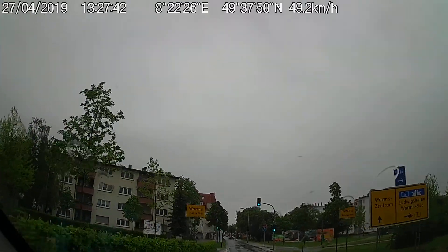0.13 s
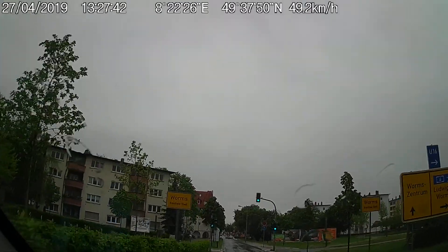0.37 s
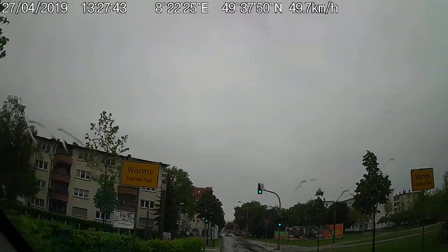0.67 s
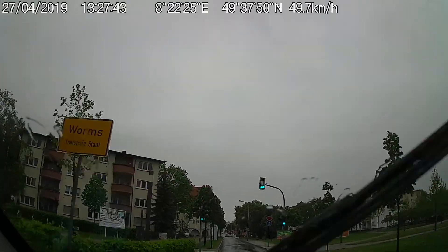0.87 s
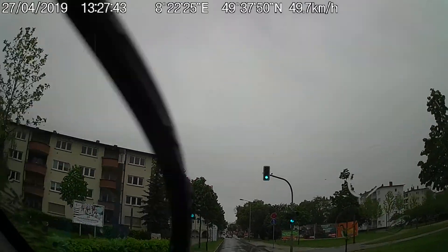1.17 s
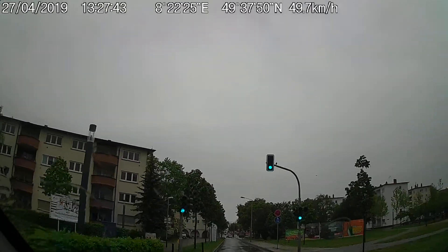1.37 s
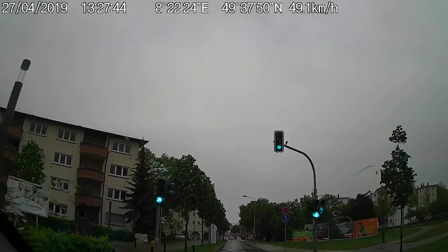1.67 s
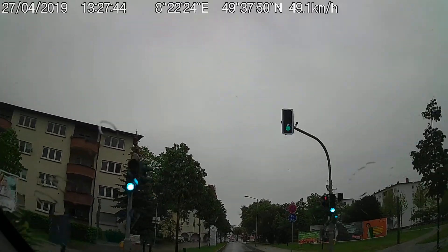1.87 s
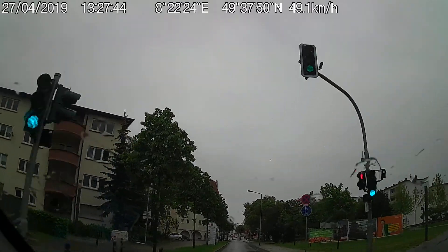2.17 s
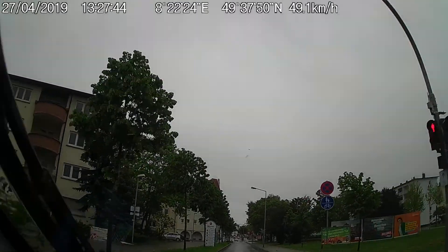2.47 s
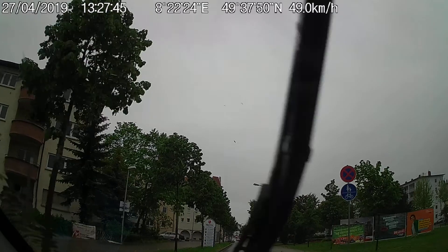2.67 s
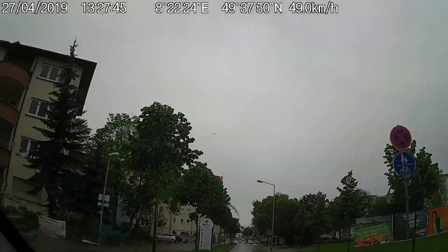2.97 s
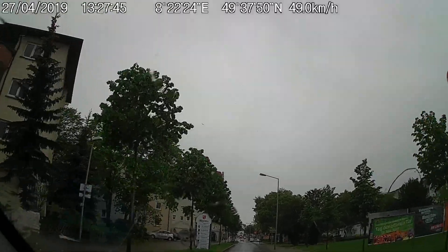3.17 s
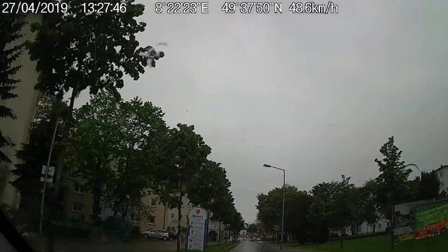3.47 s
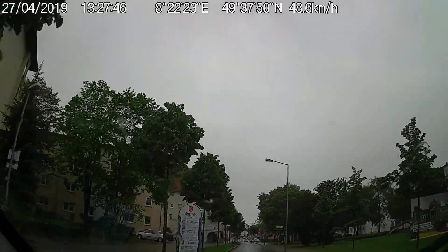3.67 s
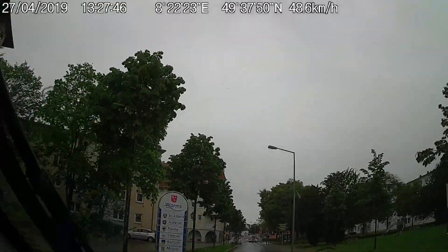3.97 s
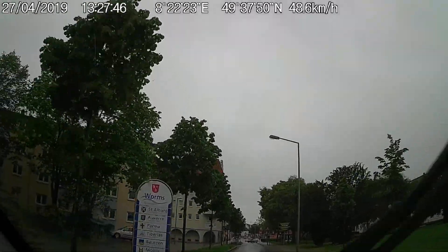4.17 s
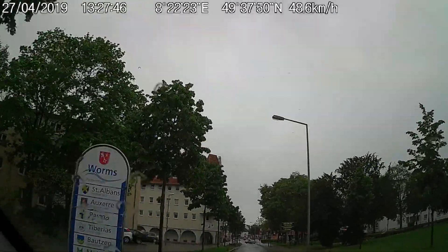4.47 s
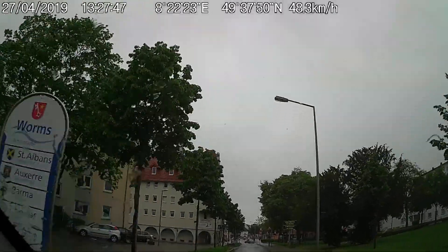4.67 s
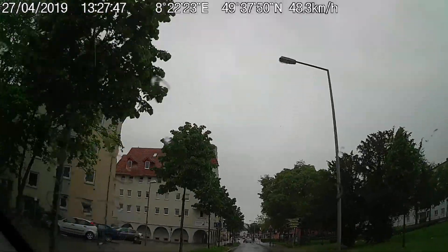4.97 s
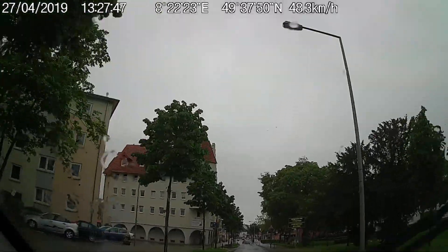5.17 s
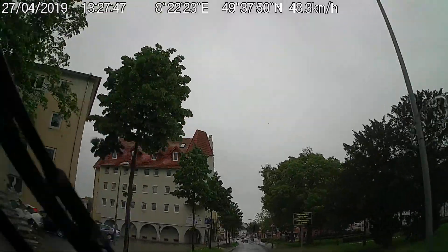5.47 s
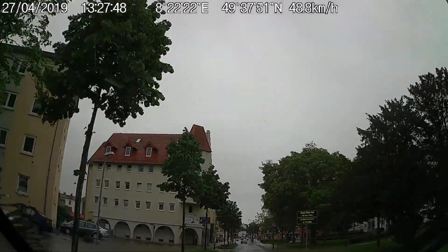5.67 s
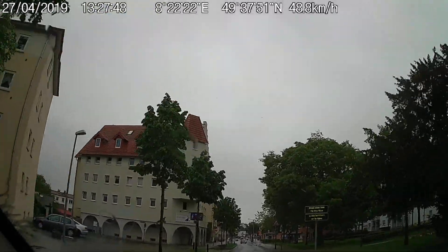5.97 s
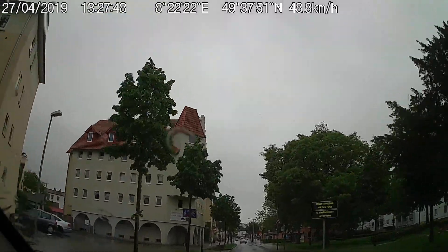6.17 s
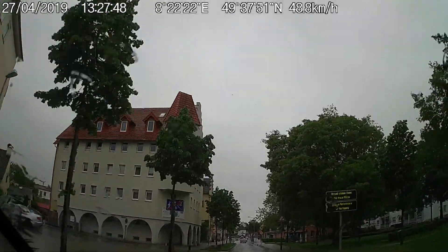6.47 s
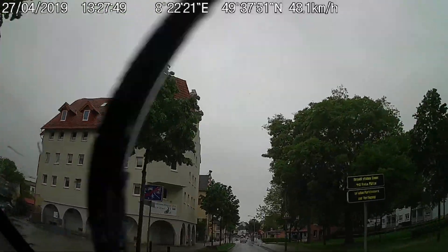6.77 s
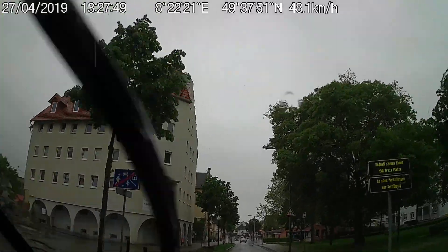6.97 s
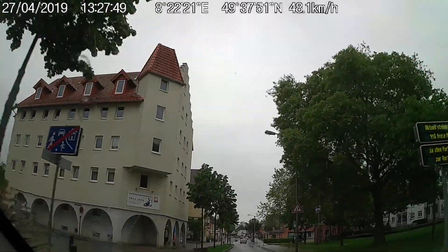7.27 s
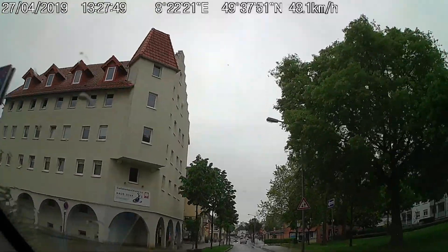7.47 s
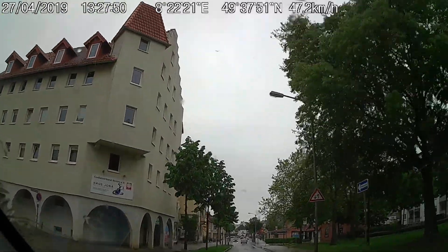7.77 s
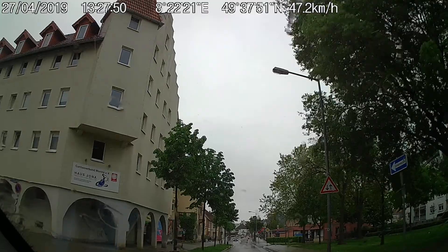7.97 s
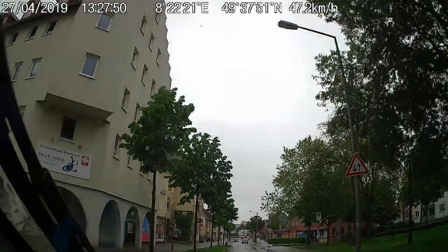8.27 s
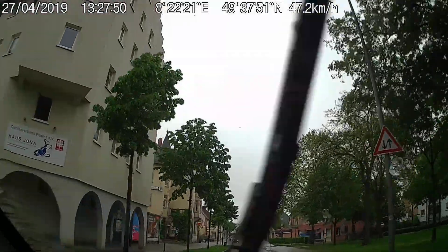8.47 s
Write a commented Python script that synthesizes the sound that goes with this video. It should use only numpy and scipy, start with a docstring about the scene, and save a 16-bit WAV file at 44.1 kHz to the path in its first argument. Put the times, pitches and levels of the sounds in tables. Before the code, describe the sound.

Dull car-cabin rumble on wet asphalt with raindrops tapping the windscreen, occasional soft wiper thuds and hard knocks, and a faint engine hum swelling near the end.

```python
"""Car cabin in light rain

Inside a car rolling through town, heard by a small camera on the windscreen.
Filtered noise makes wet road roar and panel boom; clicks and spatter ring the glass as raindrops.
Thumps and judder, from wipers or road bumps, and linkage clacks ring decaying cabin modes;
the wiper blade squeaks and chirps, and short treble fizzes come mostly at loud thumps.
Gliding sines make a low engine drone that swells now and then, over wavering drive-train tones;
the camera adds pulsing hiss, frame hum and thin whistles."""
import sys
import numpy as np
from scipy import signal
from scipy.fft import rfft, irfft, next_fast_len
from scipy.io import wavfile
from scipy.ndimage import uniform_filter1d

SR = 44100
rng = np.random.default_rng(int(sys.argv[2]) if len(sys.argv) > 2 else 0)


def log_audio(samples):
    """Write samples as a 16-bit WAV file to the path given in sys.argv[1]."""
    # one column per channel
    frames = np.atleast_2d(samples).T
    # limit to full scale, then quantise
    limited = np.clip(frames, -1, 1)
    pcm = np.round(limited * 32767).astype(np.int16)
    wavfile.write(sys.argv[1], SR, pcm)


N = 380141

# Wiper linkage clacks: start_s, peak_db, colour_centre_hz, ring_share (of the cabin modes' t60)
CLACKS = [(.612, -20, 530, 0.41), (0.698, -13, 240, .4), (.812, -17, 340, .6), (0.844, -24, 380, .7),
          (1.244, -23, 480, 0.46), (1.302, -17.5, 440, 1.1), (1.372, -12, 710, 0.7), (1.383, -4, 226, 0.47),
          (1.386, -10.5, 453, 0.49), (1.466, -17.5, 330, 0.34), (1.978, -21, 374, 0.56),
          (2.033, -17, 410, 0.69), (4.049, -24, 300, 0.72), (4.378, -22.5, 397, 1.3), (4.544, -23, 380, .6),
          (6.165, -21, 340, 1), (7.86, -17.5, 500, .45), (7.941, -24, 503, 1), (8.049, -21, 340, 0.79),
          (8.49, -27, 400, 0.4), (8.533, -16, 442, .6), (8.605, -15.5, 795, 0.97), (8.614, -5, 313, .85)]


def amp(db):
    """Amplitude factor for a level in dB."""
    return 10 ** (np.asarray(db) / 20)


def evened(x):
    """Scales x to rms 1."""
    return x / np.sqrt(np.mean(x ** 2) + 1e-20)


def read(points, hz):
    """Reads a (frequency, value) curve along a log frequency axis."""
    f, value = np.transpose(points)
    return np.interp(np.log(hz + 1), np.log(f + 1), value)


def add(mix, s, sound):
    """Lays a sound into the mix from second s, cut off at the end."""
    part = mix[round(s * SR):][:len(sound)]
    part += sound[:len(part)]


def resonate(x, hz, width):
    """One resonance with a gain near 1 at its centre; a complex pole sets pitch and width in Hz."""
    r = np.exp(-np.pi * width / SR)
    pole = r * np.exp(2j * np.pi * hz / SR)
    return 2 * signal.lfilter([1 - r], [1, -pole], x).real


def coloured(x, points):
    """Filters x by a spectrum in dB."""
    size = next_fast_len(N)
    gain = amp(read(points, np.fft.rfftfreq(size, 1 / SR)))
    return irfft(rfft(x, size) * gain, size)[:N]


def wander(seconds):
    """Smooth random drift of rms 1: noise averaged twice over the given time."""
    span = max(round(seconds * SR), 1)
    once = uniform_filter1d(rng.standard_normal(N), span)
    return evened(uniform_filter1d(once, span))


def burst(noise, t60):
    """Noise that fades in within half a millisecond and dies away over t60 seconds."""
    t = np.arange(noise.shape[-1]) / SR
    return noise * amp(-60 * t / t60) * np.minimum(t / 0.00045, 1)


def peaked(x, hz, width):
    """A steep band of x, three resonances in a row, with its peak at 1."""
    band = x
    for _ in range(3):
        band = resonate(band, hz, width)
    return band / abs(band).max()


def dips(t):
    """Brief level sags in dB at times t, each with a slow sink and a quick return."""
    # return_s, depth_db, sinking_time_s
    dip_table = [(.12, -0.5, 0.03), (2.15, -4, .05), (2.77, -5, 0.015), (3.43, -7, .03), (3.79, -4, 0.056),
                 (4.115, -5, 0.035), (4.715, -6, 0.014), (4.96, -5, 0.027), (5.6, -2, 0.048),
                 (5.695, -0.5, 0.023), (5.985, -6, 0.033), (6.115, -8, 0.023), (6.274, -11.5, 0.053),
                 (6.705, -6.5, 0.045), (6.85, -2, 0.084), (7.12, -9, 0.015)]
    return_time_s = 0.0031
    level_db = 0
    for s, depth_db, sink_s in dip_table:
        side_s = np.where(t < s, sink_s, return_time_s)
        level_db = level_db + depth_db * np.exp(-((t - s) / side_s) ** 2)
    return level_db


def road(patchy_db=0.97, flicker_db=1.5, gust_db=1.47):
    """Tyre roar on wet asphalt: noise with drifting patches, gusts and a flicker where spray lands."""
    # Course of the ride, only the change about each mean counts: time_s, roar_level_db, spray_level_db
    ride = [(0, -35.5, -44.5), (.15, -33, -49.5), (.72, -33, -50.5), (1.4, -37, -53), (1.9, -35.5, -53),
            (2.16, -39.5, -54.5), (2.64, -35, -51), (3.2, -39, -56), (3.5, -33, -48.5), (3.75, -37, -55),
            (3.98, -35, -50.5), (4.37, -34, -48.5), (5.55, -35, -50), (6.05, -36.5, -50.5),
            (6.75, -34.5, -52.5), (7.0, -34, -49.5), (7.73, -34.5, -50), (8.0, -34.5, -52),
            (8.62, -32.5, -49.5)]
    # Relative spectrum of the roar and spray: frequency_hz, level_db (per Hz)
    roar_spectrum = [(12, -28), (26, -6), (48, -1), (68, -17), (130, -15), (200, -15.5), (400, -12),
                     (650, -16), (900, -12.5), (1250, -17.5), (1800, -27), (2300, -39.5), (2850, -29.5),
                     (3500, -36), (4100, -55.5), (6500, -57), (12000, -78)]
    s, roar_db, spray_db = np.transpose(ride)
    # Short-time spectra of 512 samples, one every 128
    frames, hz = N // 128 + 5, np.fft.rfftfreq(512, 1 / SR)
    t = (np.arange(frames) * 128 - 256) / SR
    real, imag, patches = rng.standard_normal((frames, 257, 3)).T
    patches = evened(uniform_filter1d(uniform_filter1d(patches, 6, 0), 20, 1))
    flicker = evened(uniform_filter1d(rng.standard_normal(frames), 5))
    gusts = evened(uniform_filter1d(uniform_filter1d(rng.standard_normal(frames), 20), 20))

    low_db = np.interp(t, s, roar_db - roar_db.mean())
    high_db = np.interp(t, s, spray_db - spray_db.mean())
    top = np.clip((hz - 1900) / 600, 0, 1)[:, None]  # spray takes over from roar around 2 kHz
    swing_db = (1 - top) * low_db + top * high_db + gust_db * gusts + dips(t)
    share = np.clip(hz / 400, 0, 1)[:, None]  # the bass hardly follows these changes
    moving_db = (flicker_db + 1.27 * top) * flicker + swing_db
    field = (real + 1j * imag) * amp(patchy_db * patches + share * moving_db)
    noise = signal.istft(field, nperseg=512, noverlap=384)[1][:N]
    return amp(-35.0) * evened(coloured(noise, roar_spectrum))


def boom(lumpy_db=1.5):
    """Noise in the panel resonances, lumpy, with swells over a steady level."""
    # Shaken panels: frequency_hz, width_hz (each of two passes), relative_gain_db
    panel_table = [(47.5, 22.3, 3), (108, 36, 4.5), (140, 36, 3.5), (230.3, 77.5, -8), (380, 514, -15),
                   (528, 260, -37)]
    # Swells added to the steady boom: centre_s, top_db (before the lumps), half_width_s
    swell_table = [(.78, -25, 0.22), (1.4, -31, 0.14), (1.6, -39.5, 0.45), (2.0, -31, 0.11),
                   (4.1, -40, 0.045), (4.4, -40, 0.019), (4.78, -39, 0.17), (6.2, -36.5, 0.24),
                   (8.04, -24, 0.22), (8.55, -22.5, 0.023)]
    steady_db = -39
    shake, t = rng.standard_normal(N), np.arange(N) / SR
    panels = sum(amp(db) * resonate(resonate(shake, hz, width), hz, width)
                 for hz, width, db in panel_table)
    level = amp(steady_db)
    for centre_s, db, half_s in swell_table:
        level = level + amp(db) * np.exp(-((t - centre_s) / half_s) ** 2)
    return level * amp(lumpy_db * wander(0.028)) * evened(panels)


def cruise():
    """Drive-train hum: narrow bands of noise, heard as tones that waver in level and pitch."""
    # frequency_hz, level_db (rms)
    tone_table = [(53, -40.5), (78, -45), (135, -45.5)]
    noise = rng.standard_normal(N)
    return sum(amp(db) * evened(resonate(resonate(noise, hz, 3.4), hz, 3.4)) for hz, db in tone_table)


def electronics(loud):
    """Camera hiss pulsing with frame and line clocks, hum and whistles; loud blows stir the hiss."""
    # Relative hiss spectrum: frequency_hz, level_db (per Hz)
    hiss_spectrum = [(2600, -14), (4500, -2.5), (7500, -6.5), (10100, -3.5), (11000, -2), (12400, -2.5),
                     (13800, -5), (14400, -1.5), (15000, -6), (16000, -7)]
    # Frame hum before its slow waver: multiple_of_frame_rate, level_db (rms)
    hum_table = [(1, -43), (3, -43), (4, -48), (6, -54), (7, -47), (8, -57), (10, -57), (12, -54)]
    # Thin whistles: frequency_hz, level_db (rms)
    whistle_table = [(7112, -81), (7144, -86), (12487, -88), (14224, -82), (14258, -86), (14288, -80)]
    frame_hz, line_hz, hiss_db = 30.0, 307.2, -59
    t = np.arange(N) / SR
    pulse = 1 + 0.058 * np.cos(2 * np.pi * frame_hz * t) + 0.047 * np.cos(4 * np.pi * frame_hz * t)
    pulse = pulse + 0.11 * np.cos(2 * np.pi * line_hz * t)
    stirred = 1 + 0.86 * abs(loud)
    noise = rng.standard_normal(N) * pulse * stirred * amp(0.77 * wander(0.017))
    hiss = amp(hiss_db) * evened(coloured(noise, hiss_spectrum))

    hum = sum(amp(db) * np.sin(2 * np.pi * (k * frame_hz * t + rng.random())) for k, db in hum_table)
    hum = hum * amp(0.44 * wander(0.11))

    jitter = wander(0.03) / 14000  # the clock drifts, which widens the whistles
    clock = 2 * np.pi * t + 0.9 * jitter
    whistles = sum(amp(db) * np.sin(hz * clock + 6 * rng.random()) for hz, db in whistle_table)
    return hiss + np.sqrt(2) * (hum + whistles)


def tap(levels_db, noise, t60=0.019):
    """A hit on the glass: one click and a weaker spatter ring three broad bands."""
    # Glass bands: frequency_hz, width_hz (each of three passes)
    glass_bands = [(1150, 1200), (2900, 1500), (5500, 4000)]
    click = np.arange(noise.shape[-1]) == 4
    hits = 0.23 * burst(noise, t60) + click
    return sum(amp(db) * peaked(hit, hz, width)
               for db, hit, (hz, width) in zip(levels_db, hits, glass_bands))


def rain():
    """Big drops on the glass one by one, over a random patter of small ones."""
    # start_s, body_peak_db (near 1.2 kHz), tick_peak_db (near 3 kHz), splash_peak_db (near 5.5 kHz)
    drop_table = [(0.128, -25, -46, -58), (0.138, -18, -33, -52), (0.236, -23, -38, -61),
                  (0.325, -29, -33, -60), (0.413, -15, -25, -43), (.483, -26, -36, -62),
                  (0.533, -24, -28.5, -55), (.585, -28, -36, -58), (0.936, -26, -36, -61),
                  (.992, -24, -44, -58), (1.291, -24.5, -39, -57), (1.416, -30, -35, -60),
                  (1.803, -27, -32.5, -52), (1.842, -24, -30, -59), (2.091, -28, -45, -57),
                  (2.286, -30, -36, -59), (2.517, -28, -33.5, -65), (2.775, -43, -42, -52),
                  (2.86, -25.5, -33, -56), (3.53, -36, -35.5, -58), (3.903, -32, -42, -55),
                  (4.013, -26, -34, -60), (4.071, -32, -46, -60), (4.281, -28, -36, -58),
                  (4.341, -25, -31, -55), (4.574, -26, -32, -50), (4.909, -22, -33, -52),
                  (5.192, -28, -34, -51), (5.259, -29, -34, -65), (5.472, -25, -38, -52),
                  (5.579, -34, -37, -46), (5.698, -33, -39, -60), (6.281, -30, -42, -60),
                  (6.364, -33, -37, -62), (6.567, -34, -37, -54), (6.712, -40, -42, -64),
                  (6.857, -24.5, -34, -65), (6.959, -37, -38, -56), (7.04, -23.5, -33.5, -56),
                  (7.069, -30, -39, -61), (7.382, -28, -36, -50), (7.826, -21, -37, -63),
                  (7.846, -25, -32, -57), (8.248, -26, -33, -63), (8.386, -24, -37, -54),
                  (8.419, -24, -47, -62), (8.552, -30, -52, -64)]
    patter_db, patter_per_s = -45, 500
    out, patter = np.zeros(N), np.zeros(N)
    for (s, *levels_db), noise in zip(drop_table, rng.standard_normal((len(drop_table), 3, 800))):
        add(out, s, tap(levels_db, noise))

    falls = rng.random(N) < patter_per_s / SR
    size = amp(4.0 * np.minimum(rng.exponential(1, N), 3.5)) * falls
    spot = rng.integers(0, 12, N)  # each small drop takes one of twelve tap sounds
    for k, noise in enumerate(rng.standard_normal((12, 3, 800))):
        small_tap = tap((0, -11, -25), noise)
        patter += signal.oaconvolve(size * (spot == k), small_tap)[:N]
    return out + amp(patter_db + dips(np.arange(N) / SR)) * evened(patter)


def chirps():
    """Short wet chirps of the blade edge as a sweep starts or ends: noise bursts in a narrow band."""
    # start_s, peak_db, pitch_hz, t60_s (of the burst)
    chirp_table = [(0.5374, -45, 5650, 0.071), (1.2321, -46.5, 5630, 0.06), (7.7857, -46, 5700, 0.046)]
    out = np.zeros(N)
    for (s, db, hz, t60), noise in zip(chirp_table, rng.standard_normal((len(chirp_table), 3000))):
        add(out, s, amp(db) * peaked(burst(noise, t60), hz, 930))
    return out


def blows(table, spread, rise):
    """Each blow rings the cabin modes nearest its colour, after a soft rise."""
    # Cabin and glass modes: frequency_hz, relative_level_db, t60_s (before the blow's ring share)
    mode_table = [(90.6, -32, 0.23), (112, -1.5, 0.13), (137, 0, 0.13), (163.5, -22.5, 0.21),
                  (171, 9.5, 0.13), (215, 10, 0.12), (340, 12, 0.076), (410, 3, 0.19), (501, 9, 0.068),
                  (746, 2, 0.12), (880, 10.5, 0.046), (1150, 4, .05)]
    out, t = np.zeros(N), np.arange(SR // 4) / SR
    hz, db, t60 = np.transpose(mode_table)[:, :, None]
    onset = np.sin(np.pi / 2 * np.clip(t / (2 * rise), 0, 1)) ** 2
    modes = np.sin(2 * np.pi * hz * (t - rise)) * onset
    for s, peak_db, centre_hz, ring in table:
        near = np.exp(-(np.log(hz / centre_hz) / spread) ** 2)
        decay = amp(db - 60 * t / (t60 * ring))
        sound = (near * decay * modes).sum(0)
        add(out, s - 0.589 * rise, amp(peak_db) * sound / abs(sound).max())  # the rise begins early
    return out


def thumps():
    """Low soft thumps and judder, from wipers or road bumps: slow blows that ring few cabin modes."""
    # start_s, peak_db, colour_centre_hz, ring_share (of the cabin modes' t60)
    thump_table = [(.555, -29, 135, 1), (.61, -24, 130, 1), (.684, -16, 137, 1), (.714, -18, 137, 0.91),
                   (.75, -13, 147.5, 1), (.775, -13.5, 108, 0.62), (.814, -8.5, 137, .8),
                   (.843, -16, 131, 1), (.868, -9, 110, 0.66), (.916, -16, 127, 0.66), (.943, -34, 106, .8),
                   (1.03, -24.5, 155, 0.97), (1.074, -29, 133, .8), (1.3, -24, 140, 0.78),
                   (1.404, -14, 146, 0.44), (1.434, -18.5, 129, 0.46), (1.462, -16.5, 176, .7),
                   (1.508, -24, 175, .9), (1.533, -31, 114, 0.65), (1.676, -36, 137, .8),
                   (1.95, -24, 130, 0.94), (1.985, -20.5, 144, 0.87), (4.05, -21.5, 140, .6),
                   (4.378, -14.5, 131, 0.51), (4.395, -13.5, 121, 0.51), (4.55, -15, 128, 0.65),
                   (4.75, -23.5, 132, 0.73), (4.779, -24, 96, 0.51), (4.805, -26, 129, .7),
                   (6.16, -24, 173, 1), (6.43, -26, 102, 0.7), (6.469, -22, 140, 0.69),
                   (7.909, -27, 142, 1), (7.936, -14, 140, .9), (7.997, -11, 136, 1),
                   (8.055, -10, 137, 0.69), (8.142, -17.5, 134, 0.59), (8.28, -27, 140, 0.76),
                   (8.527, -28, 102, .7)]
    return blows(thump_table, spread=0.13, rise=0.014)


def clacks():
    """Linkage clacks: quick-rising blows that ring a wider range of cabin modes."""
    return blows(CLACKS, spread=0.53, rise=0.0036)


def slaps():
    """The glass answers each clack with a short bright slap."""
    slap_db, slap_t60_s = np.array([-19.5, -30, -59]), 0.033  # dB below the clack in each glass band
    out = np.zeros(N)
    for (s, db, *_), noise in zip(CLACKS, rng.standard_normal((len(CLACKS), 3, 800))):
        add(out, s, tap(db + slap_db, noise, slap_t60_s))
    return out


def fizzes():
    """Short treble fizzes, mostly at loud thumps: noise bursts in a wide treble band."""
    # start_s, peak_db
    fizz_table = [(.6853, -45), (.7143, -50), (.7577, -46), (.842, -45), (.8694, -46), (1.3734, -48),
                  (4.0442, -40), (4.3774, -40.5), (4.5426, -42), (7.8141, -48), (7.9399, -43),
                  (7.9997, -48), (8.0416, -45), (8.0744, -45), (8.1544, -44)]
    out = np.zeros(N)
    for (s, db), noise in zip(fizz_table, rng.standard_normal((len(fizz_table), 3000))):
        add(out, s, amp(db) * peaked(burst(noise, 0.043), 8700, 12300))
    return out


def squeaks():
    """Faint rubber squeaks: a slightly rough tone while the blade edge sticks and slips."""
    # start_s, length_s, pitch_hz (before the roughness), top_level_db (rms)
    squeak_table = [(0.93, 0.042, 700, -50), (0.996, 0.055, 696, -40), (1.046, 0.094, 709, -38),
                    (1.575, .045, 700, -35.5)]
    out, rough = np.zeros(N), wander(0.0029)
    for s, length, hz, db in squeak_table:
        t = np.arange(0, length, 1 / SR)
        pitch_hz = hz * (1 + 0.015 * rough[:len(t)])
        tone = np.sin(2 * np.pi * np.cumsum(pitch_hz) / SR)
        add(out, s, np.sqrt(2) * amp(db) * tone * signal.windows.tukey(len(t), 0.6))
    return out


def drones():
    """Near-pure firing tone that glides with engine speed; each swell rises, holds and falls."""
    # Swells before the waver: start_s, length_s, top_level_db (rms), third_harmonic_db (rms)
    drone_table = [(5.68, 0.34, -30.5, -49), (6.0, 0.42, -40, -54), (6.5, 0.25, -34, -50),
                   (6.826, 0.28, -29, -45), (7.286, 0.7, -23.5, -41.5), (8.02, .8, -27, -44)]
    # Engine speed: time_s, firing_rate_hz
    rev_table = [(5.65, 43.7), (5.85, 47), (6.09, 55.2), (6.39, 54.5), (6.5, 50.4), (6.79, 44.3),
                 (6.81, 20), (6.97, 22.5), (7.24, 30.5), (7.46, 35.6), (7.7, 40.2), (7.93, 43.5),
                 (8.1, 44.4), (8.62, 44.7)]
    rise_s, fall_s, waver_db = 0.12, 0.13, 1.2
    t = np.arange(N) / SR
    turn = 2 * np.pi * np.cumsum(np.interp(t, *np.transpose(rev_table))) / SR
    first = np.sin(turn)
    upper = np.sin(3 * turn) + 0.6 * np.sin(4 * turn) + 0.83 * np.sin(5 * turn)
    out = 0
    for s, length, db, third_db in drone_table:
        swell = np.clip(np.minimum((t - s) / rise_s, (s + length - t) / fall_s), 0, 1)
        out = out + swell * (amp(db) * first + amp(third_db) * upper)
    return np.sqrt(2) * out * amp(waver_db * wander(0.18))


def scene():
    """Sums road, car, blows, blade, rain and camera noise into one channel."""
    knocks = thumps() + clacks()
    ride = road() + boom() + cruise() + drones()
    blade_and_fizz = slaps() + squeaks() + chirps() + fizzes()
    return (ride + knocks + blade_and_fizz + rain() + electronics(knocks))[None]


def record(dry):
    """The camera's band limit: a steep low-pass at 15.69 kHz."""
    low_pass = signal.firwin(2047, 15690, window=("kaiser", 10), fs=SR)
    return signal.oaconvolve(dry, low_pass[None], "same")


dry = scene()
out = record(dry)
log_audio(out)
```